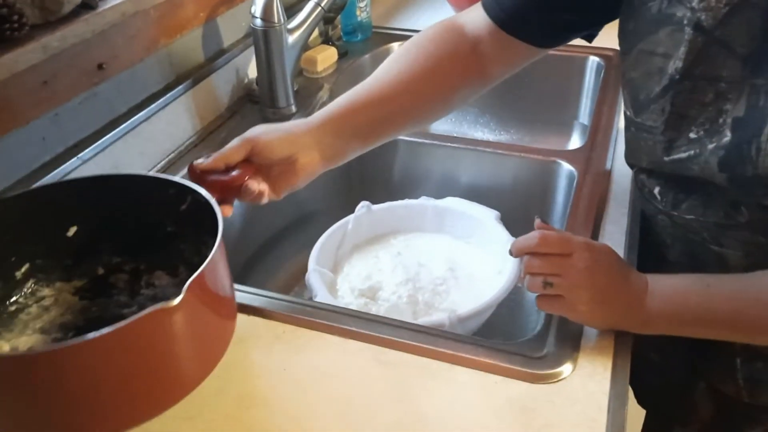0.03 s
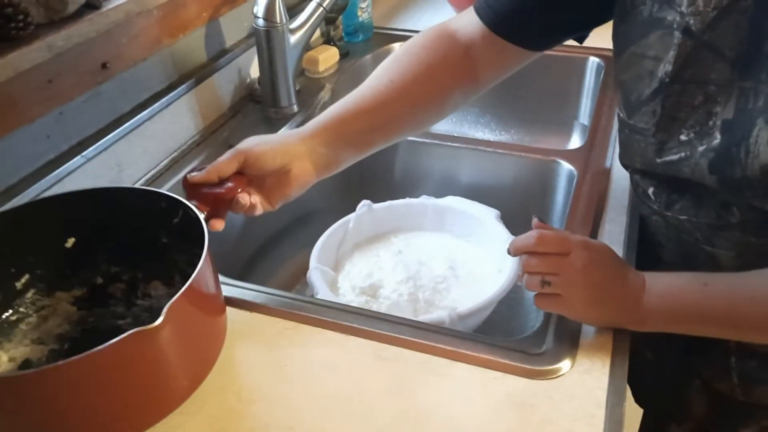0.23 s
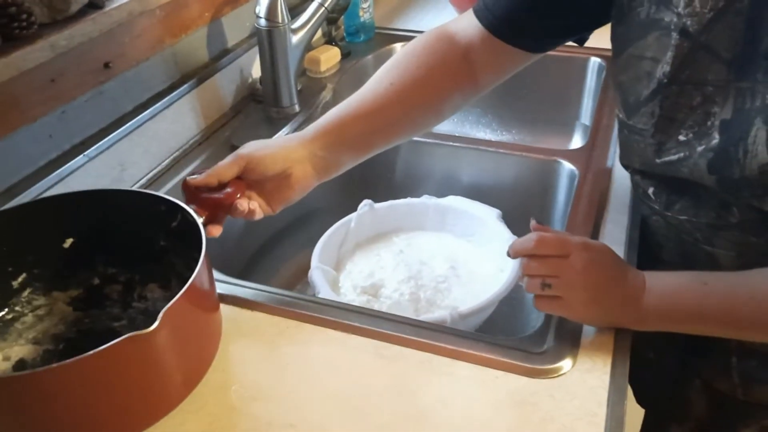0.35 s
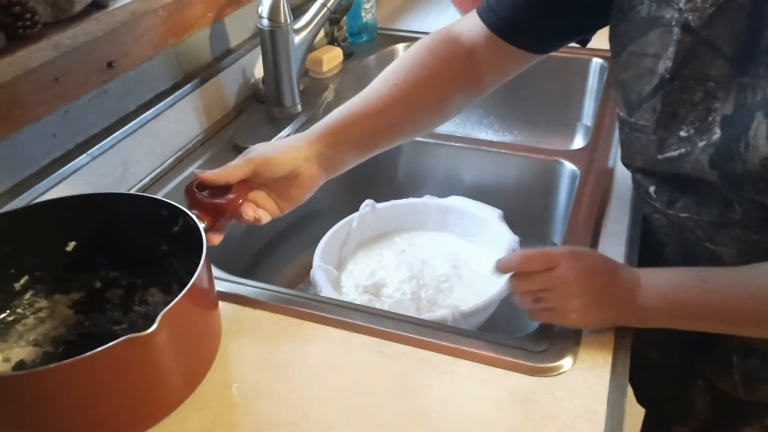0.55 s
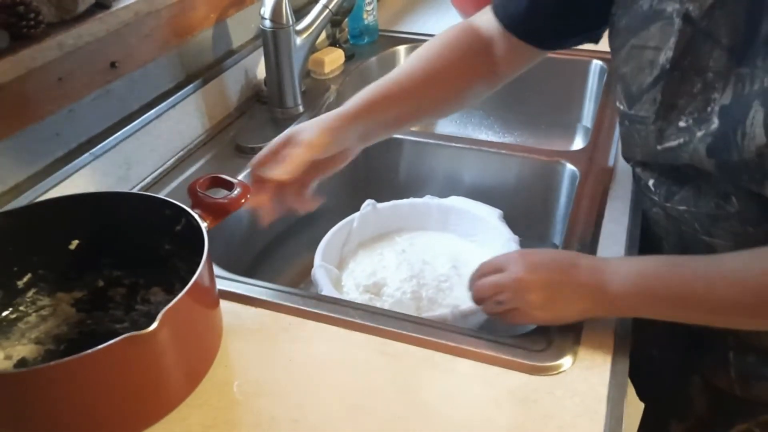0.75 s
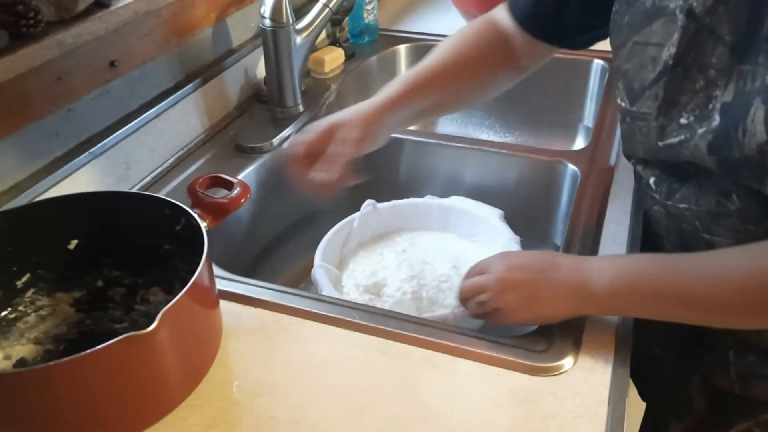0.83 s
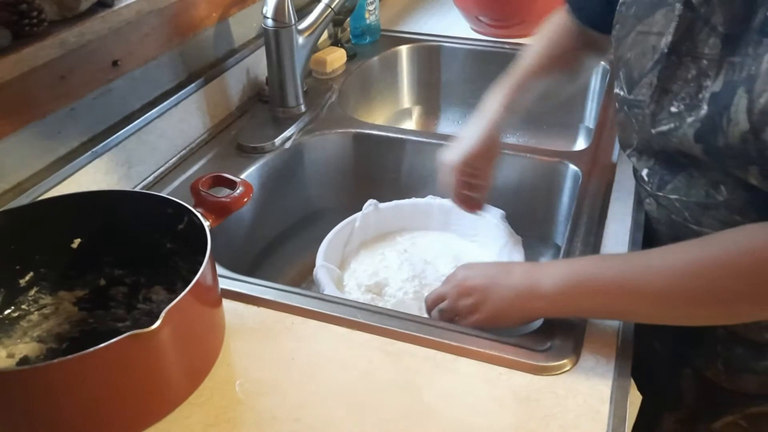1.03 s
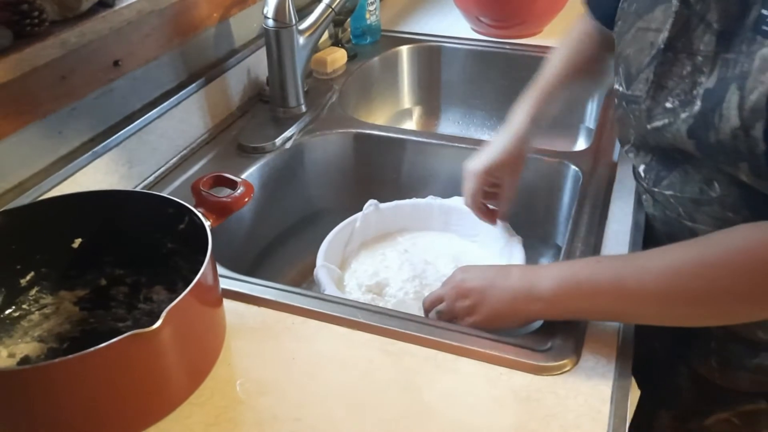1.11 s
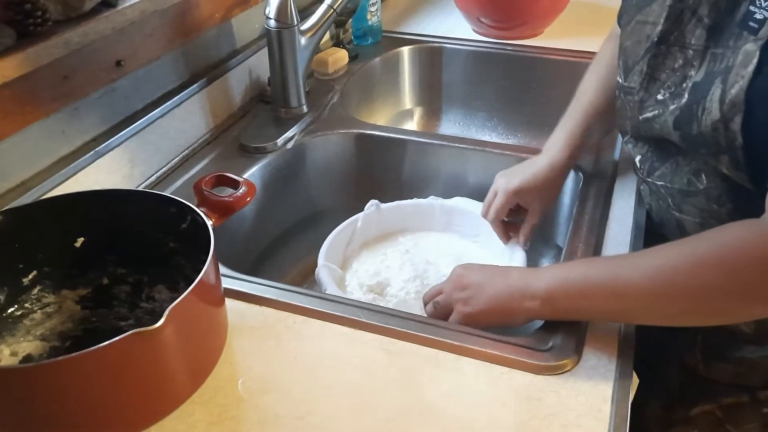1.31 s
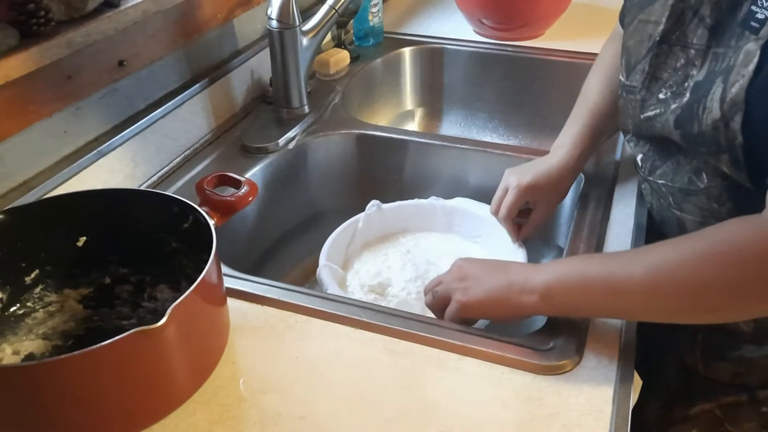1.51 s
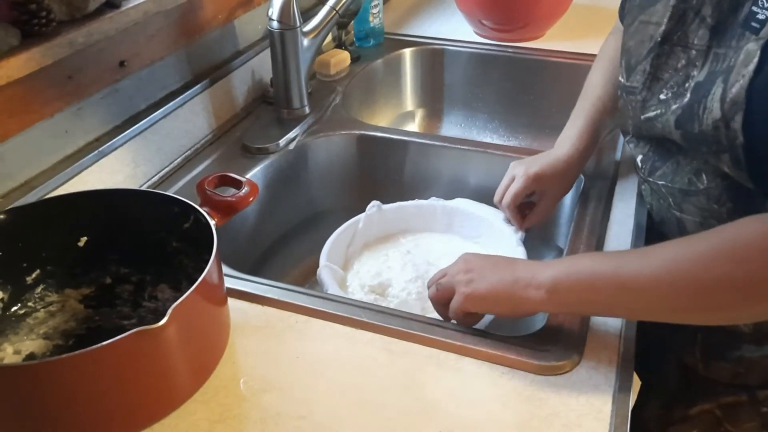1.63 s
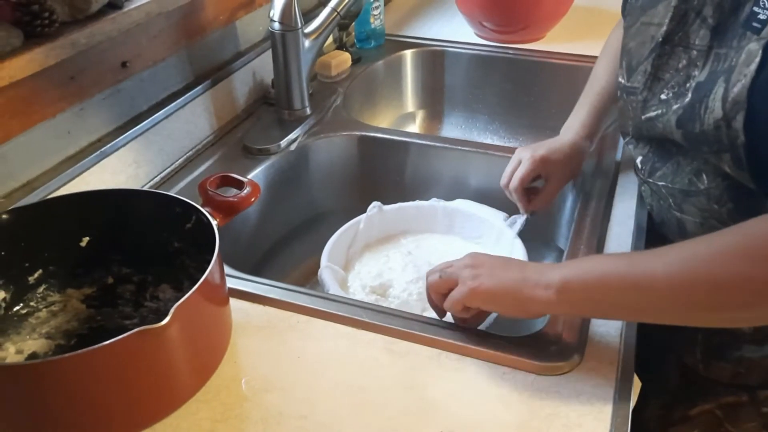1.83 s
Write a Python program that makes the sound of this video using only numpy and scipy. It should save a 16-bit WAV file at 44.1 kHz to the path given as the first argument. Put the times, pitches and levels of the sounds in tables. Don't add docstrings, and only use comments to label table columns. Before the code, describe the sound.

Loud clunk of a pot set on a countertop, brief metallic ring, then drips in a steel sink

```python
import sys
import numpy as np
from scipy import signal
from scipy.fft import rfft, irfft, next_fast_len
from scipy.io import wavfile
from scipy.ndimage import uniform_filter1d, map_coordinates

SR = 44100
rng = np.random.default_rng(int(sys.argv[2]) if len(sys.argv) > 2 else 0)


def dump(signal):
    limited = np.clip(np.atleast_2d(signal).T, -1, 1)
    pcm = np.round(limited * 32767).astype(np.int16)
    wavfile.write(sys.argv[1], SR, pcm)


def voltage_ratio(level):
    return 10 ** (np.asarray(level, float) / 20)


N = 83790


def unit(x):
    return x / np.sqrt(np.mean(x ** 2) + 1e-20)


def along(points, hz):
    f, value = np.transpose(points)
    return np.interp(np.log(hz + 1), np.log(f + 1), value)


def wobble(rate):
    return map_coordinates(rng.standard_normal(200), [np.arange(N) * rate / SR])


def filtered(x, response):
    m = next_fast_len(N + SR // 2)
    return irfft(rfft(x, m) * response(np.fft.rfftfreq(m, 1 / SR)), m)[..., :N]


def dying(s, t60, attack=0.00089):
    t = np.maximum(np.arange(N) / SR - s, 0)
    return voltage_ratio(-60 * t / t60) * (1 - np.exp(-t / attack))


def panned(x, db):
    return x * voltage_ratio(np.array([[db / 2], [-db / 2]]))


# frequency in Hz, left-right correlation from 0 to 1.
ALIKE = [(60, 0.87), (240, 0.77), (950, 0.63), (3770, 0.03), (15000, 0.01)]


def rush(spectrum, patchy_db=0):
    z = signal.stft(rng.standard_normal((2, N)), nperseg=512)[2]
    field = uniform_filter1d(rng.standard_normal(z.shape[1:]), size=5, axis=0)
    field = uniform_filter1d(field, size=12, axis=1)
    pair = signal.istft(z * voltage_ratio(patchy_db * unit(field)), nperseg=512)[1][:, :N]

    def mid_side(hz):
        angle = np.arccos(np.clip(along(ALIKE, hz), -1, 1)) / 2
        return voltage_ratio(along(spectrum, hz)) * [np.cos(angle), np.sin(angle)]

    mid, side = filtered(pair, mid_side)
    return unit(np.array([mid + side, mid - side]))


# frequency in Hz, t60 in s.
KITCHEN = [(100, 0.77), (400, 0.55), (2000, 0.36), (8000, 0.39), (15000, 0.12)]


def room(x):
    hz, t, z = signal.stft(rush([(20, 0)])[:, :SR * 3 // 4], SR, nperseg=256)
    tail = signal.istft(z * voltage_ratio(-60 * t / along(KITCHEN, hz)[:, None]), SR, nperseg=256)[1]
    late = np.pad(x, (130, 0))
    return signal.fftconvolve(late[None], tail / np.linalg.norm(tail[0]), axes=1)[:, :N]


INWARD_HZ = 350
DAMPED_DB_PER_S = 373.5


def ringing(s, free, modes, attack=0.00018):
    t = np.arange(N) / SR - s
    ring = np.zeros(N)
    for hz, db, t60 in modes:
        sign = -1 if hz > INWARD_HZ else 1
        ring += sign * voltage_ratio(db) * dying(s, t60, attack) * np.sin(2 * np.pi * hz * t)
    return ring * voltage_ratio(-DAMPED_DB_PER_S * np.maximum(t - free, 0))


# frequency in Hz, level in dB.
HUM = [(59, -83), (236, -80), (300, -70.5), (355, -69.5), (473.7, -74), (592, -78), (889, -83)]
HUM_WOBBLE_DB = 1


def fridge():
    t = np.arange(N) / SR
    return sum(voltage_ratio(db + 4.5 + HUM_WOBBLE_DB * wobble(7.28)) * np.sin(2 * np.pi * hz * t + 1.1 * wobble(7.2))
               for hz, db in HUM)


# time in seconds, level in dB.
AIR_LEVEL = [(0, -53.5), (.2, -53), (.6, -55.5), (.78, -61), (1.202, -61), (1.55, -61), (1.821, -55.5),
             (1.9, -58)]
# frequency in Hz, density in dB per Hz.
AIR_LOW = [(100, -58.5), (170, -26.5), (299, -5.5), (438, -13), (459, -8), (536, -10), (730, -30),
           (909, -18.5), (1500, -51), (1950, -84.5), (3300, -120)]
AIR_HIGH = [(1000, -17.5), (1600, -4), (2750, -5), (3500, -9), (4200, 1), (5000, -10.5), (6600, 2),
            (7600, -3.5)]
RUMBLE = [(15, -59.5), (25, -43.5), (48, -3.5), (113, -4), (145, -0.5), (190, -2.5), (250, -31),
          (420, -120)]
# frequency in Hz, gain in dB.
AIR_TOP = [(7400, 4.5), (8100, -8), (12000, -8.5), (15900, -15.5)]
AIR_WOBBLE_DB, AIR_PAN_DB = 1.6, -2.5
HISS_DB, HISS_WOBBLE_DB, HISS_PATCHY_DB, HISS_PAN_DB = -72, .5, .9, -5
RUMBLE_DB, RUMBLE_FOLLOWS = -72.5, 0.68


def kitchen_air():
    s, db = np.transpose(AIR_LEVEL)
    swell = np.interp(np.arange(N) / SR, s, db) - db.mean()
    low = voltage_ratio(db.mean() - 3.5 + AIR_WOBBLE_DB * wobble(14)) * rush(AIR_LOW, patchy_db=2.0)
    high = voltage_ratio(HISS_DB + HISS_WOBBLE_DB * wobble(12)) * rush(AIR_HIGH, patchy_db=HISS_PATCHY_DB)
    high = filtered(high, lambda hz: voltage_ratio(along(AIR_TOP, hz)))
    air = voltage_ratio(swell) * panned(low + fridge(), AIR_PAN_DB)
    air += voltage_ratio(0.5 * swell) * panned(high, HISS_PAN_DB)
    return air + voltage_ratio(RUMBLE_DB + RUMBLE_FOLLOWS * swell) * rush(RUMBLE)


# start in seconds, level in dB, centre in Hz, half width in octaves, t60 in s.
SPITS = [(.013, -56, 4660, 1.2, .08), (.183, -52, 5980, 0.99, .08), (.183, -66.5, 13000, .6, .1),
         (.779, -75, 13560, .3, .12), (0.856, -75.5, 12070, .4, .06), (0.882, -55.5, 3970, 1.5, .04),
         (.885, -63, 4520, 0.68, 0.33), (.935, -64, 9380, .9, .06), (1.287, -74.5, 12840, 0.33, 0.07),
         (1.295, -68, 2700, 0.44, 0.21), (1.561, -71, 7900, 0.65, 0.068), (1.411, -67, 6100, 0.89, 0.022),
         (1.578, -62, 2120, 1.1, .3), (1.885, -65, 8540, 0.69, 0.082)]
SPIT_EDGE_DB = -20


def spits():
    out = np.zeros((2, N))
    for s, db, hz, wide, t60 in SPITS:
        band = [(hz * 2 ** (k * wide), SPIT_EDGE_DB * k * k) for k in (-2, -1.5, 0.19, 1.4, 2)]
        out += voltage_ratio(db) * dying(s, t60, 0.00062) * rush(band)
    return out


# width in Hz, level in dB.
SINK_HZ = [880, 1060, 1185, 1620, 1810, 2050, 2400, 2800, 3330]
SINK = [(60, 3.5), (50.4, 11), (60, 9.5), (60, 4.5), (39.8, 4.5), (40, 7.5), (79.4, 5), (120, 17),
        (60, 3.5)]


def bowl(hz):
    response = 1
    for k, (centre, (width, db)) in enumerate(zip(SINK_HZ, SINK)):
        loss = 1j * hz * width
        response = response + (-1) ** k * voltage_ratio(db) * loss / (centre * centre - hz * hz + loss)
    return response


# start in seconds, peak in dB, bubble in Hz, left-right in dB.
DRIPS = [(0.013, -54, 2655, -1), (0.059, -57.5, 2790, -7), (0.082, -61, 2720, -16),
         (0.098, -55.5, 2750, -7), (0.114, -50.5, 970, 6), (0.186, -47.5, 2620, -6.5),
         (0.553, -50, 1120, 8), (0.671, -48, 1181, 11.5), (0.788, -71, 2714, 2.5), (0.88, -47.5, 2382, -6),
         (0.979, -40.5, 1091, 5.5), (1.007, -49, 1214, -3), (1.047, -86, 1136, 2), (1.131, -42, 1132, -0.5),
         (1.23, -58.5, 1174, 6), (1.291, -52.5, 1720, -11), (1.413, -36.5, 1550, 8.5),
         (1.478, -56, 2870, -4.5), (1.544, -47.5, 2000, -0.5), (1.574, -44.5, 3220, -11),
         (1.601, -50.5, 1390, 1), (1.629, -55.5, 3236, -0.5), (1.808, -68.5, 2790, -19),
         (1.882, -57, 2820, -4)]
# start in seconds, peak in dB, bubble in Hz.
TWINS = [(0.011, -54.5, 1250), (0.014, -50, 4550), (0.06, -50, 1310), (0.083, -46, 1310),
         (0.88, -52.5, 1187), (0.883, -55, 2870), (0.935, -55, 1200), (.98, -49, 1280), (1.052, -58, 2000),
         (1.052, -70, 2800), (1.131, -41, 1026), (1.296, -61.5, 2770), (1.411, -56, 2760),
         (1.412, -55.5, 1166), (1.576, -55.5, 1230), (0.531, -57, 2900), (1.616, -62, 2240),
         (1.839, -68, 2800), (.857, -72.5, 2340), (0.099, -55, 1253), (1.586, -51, 3350),
         (1.556, -61, 2500), (1.591, -53, 1990), (1.641, -59, 1970)]
TRICKLE_RATE, TRICKLE_DB, TRICKLE_HZ = 90, -78, 2400
BUBBLE_S, LIFE_SLOPE, RISE, BUBBLE_ONSET = .0028, -.3, .02, .8
FLUTTER_T60, FLUTTER_DB = .12, 3
DRIP_DB, DRIP_WET_DB = -6, -7.5


def drips():
    big = list(DRIPS) + [(*row, 0) for row in TWINS]
    small = [(a * 170 / TRICKLE_RATE, TRICKLE_DB + 8 * b, TRICKLE_HZ * 2 ** (c - .5), 6 * d - 3)
             for a, b, c, d in rng.random(size=(170, 4))]
    push = np.zeros((2, 3 * N))
    t, u = np.arange(1500) / SR, np.arange(9000) / SR
    for k, (s, db, hz, pan_db) in enumerate(big + small):
        life = BUBBLE_S * (hz / 1000) ** LIFE_SLOPE
        bubble = np.sin(2 * np.pi * hz * t * (1 + RISE * t / life))
        bubble *= np.exp(-t / life) * (1 - np.exp(-t * hz / BUBBLE_ONSET))
        if k < len(big):
            walls = rng.standard_normal((2, len(u))) * voltage_ratio(-60 * u / FLUTTER_T60)
            walls *= voltage_ratio(FLUTTER_DB) / np.linalg.norm(walls[0])
            walls[:, 0] = 1
            bubble = signal.fftconvolve(bubble[None], walls, axes=1)
        i = round(s * SR)
        push[:, i:i + bubble.shape[-1]] += panned(voltage_ratio(db + DRIP_DB) * bubble, np.clip(pan_db, -6, 6))
    dry_drips = filtered(push[:, :N], bowl)
    spray = spits()
    return dry_drips + spray + voltage_ratio(DRIP_WET_DB) * room(dry_drips.mean(0) + spray[0])


# start in seconds, thud in dB, boom in dB, crack or knock in dB, free ringing in s.
CONTACTS = [
    (0.2149, -48, -59, -63, 0.0084),
    (0.2219, -11.5, -15, -16, 0.15),
    (0.2783, -17.5, -47, -27, 0.34),
    (0.414, -33, -65, -24, 0.023),
    (0.4172, -28.5, -31.5, -29.5, 0.015),
    (0.459, -41, -69, -41, 0.078),
]
THUD_ATTACK_S = .0012
# level in dB, t60 in s.
COUNTER_HZ = [68, 200, 303, 360, 414, 538, 558, 612, 706]
COUNTER = [(-20, 0.38), (-12.5, 0.097), (-3.5, 0.08), (14, .017), (-3, 0.22), (-17.5, 0.43), (-17, .3),
           (-17.5, .12), (-22.5, 0.37)]


def counter_thud():
    modes = [(hz, *mode) for hz, mode in zip(COUNTER_HZ, COUNTER)]
    return sum(voltage_ratio(db) * ringing(s, free, modes, THUD_ATTACK_S) for s, db, _, _, free in CONTACTS)


# frequency in Hz, level in dB, t60 in s.
BOOM = [(143, -0.5, .7)]
SETTLE_MODES = [(65, -13.5, 0.6), (142.6, 1, 0.29), (239, -12, 0.087), (320, 5.5, 0.043)]
SETTLE_S, SETTLE_DB, SETTLE_FREE_S = .586, -39, .07


def cupboard_boom():
    boom = sum(voltage_ratio(db) * ringing(s, free, BOOM, THUD_ATTACK_S) for s, _, db, _, free in CONTACTS)
    return boom + voltage_ratio(SETTLE_DB) * ringing(SETTLE_S, SETTLE_FREE_S, SETTLE_MODES, 0.0024)


# frequency in Hz, density in dB per Hz.
KNOCK = [(90, -24.5), (280, 6), (500, -8.5), (850, -0.5), (1300, -10.5), (2500, -29), (6000, -41),
         (15900, -51.5)]
KNOCK_T60, KNOCK_ATTACK_S = 0.05, 0.0036


def rocking_knock():
    return sum(voltage_ratio(db) * dying(s, KNOCK_T60, KNOCK_ATTACK_S) for s, _, _, db, _ in CONTACTS[2:]) * rush(KNOCK)


# frequency in Hz, density in dB per Hz.
CRACK = [(300, -63.5), (600, -22), (1000, -10), (2500, -18), (6000, -14.5), (8500, -27), (12000, -28),
         (15900, -41.5)]
TICK = [(700, -31), (1500, 1), (2900, 0.5), (5000, -12), (8000, -23.5), (15900, -34.5)]
CRACK_T60, RATTLE_T60, RATTLE_DB = 0.024, 0.065, -4
TICK_S, TICK_DB, TICK_T60 = .4126, -33, .03


def crack_and_tick():
    crack = sum(voltage_ratio(db) * (dying(s, CRACK_T60) + voltage_ratio(RATTLE_DB) * dying(s, RATTLE_T60))
                for s, _, _, db, _ in CONTACTS[:2])
    return crack * rush(CRACK) + voltage_ratio(TICK_DB) * dying(TICK_S, TICK_T60, 0.00039) * rush(TICK)


CLANG_S, SWELL_S = .222, 0.009
SHIMMER_DB, SHIMMER_TILT_DB, SHIMMER_T60 = -47, -5, .24
BODY_DB, BODY_T60 = -43, 0.33


def shimmer():
    def high():
        return [(3000 + 12000 * a, SHIMMER_TILT_DB * a * 2 + 5 * b, SHIMMER_T60 * (0.73 + c * .5))
                for a, b, c in rng.random(size=(70, 3))]

    def body():
        return [(700 + 2600 * a, 6 * b, BODY_T60 * (.5 + c)) for a, b, c in rng.random(size=(24, 3))]

    top = np.array([ringing(CLANG_S, 0.38, high(), SWELL_S) for _ in "LR"])
    return voltage_ratio(SHIMMER_DB) * top + voltage_ratio(BODY_DB) * np.array([ringing(CLANG_S, .2, body(), SWELL_S) for _ in "LR"])


# level in dB, t60 in s, left-right in dB.
POT_HZ = [938, 1028, 1186, 1441, 1741, 2056, 2347, 2701, 3098, 3584, 3871, 4635, 4893]
POT = [(-10.5, 0.28, -9), (-11.5, 0.34, -5), (-4.5, 0.65, 0.5), (-13.5, .26, 3.5), (0.5, 0.4, -5),
       (-14.5, 0.36, -7.5), (-7, 0.44, 2.5), (-17, .35, 10.5), (-7.5, 0.13, 12), (-14.5, .33, -3.5),
       (-22, .35, -5), (-19.5, 0.32, -5), (-19, .2, -7)]
CLANG_FREE_S, CLANG_DB = .115, -19.5
SPLIT_HZ, SPLIT_DB, SPLIT_T60, SPLIT_PAN_DB = 1176, -6, .45, 0.84


def clang():
    ring = sum(panned(ringing(CLANG_S, CLANG_FREE_S, [(hz, db, t60)], SWELL_S), pan_db)
               for hz, (db, t60, pan_db) in zip(POT_HZ, POT))
    ring -= panned(ringing(CLANG_S, CLANG_FREE_S, [(SPLIT_HZ, SPLIT_DB, SPLIT_T60)], SWELL_S), SPLIT_PAN_DB)
    return voltage_ratio(CLANG_DB) * np.array([ring[0], np.roll(ring[1], shift=5)])


# frequency in Hz, left-right in dB.
HIGH_PAN = [(600, 2), (1500, 1.5), (3000, 1), (5500, -6), (8000, -1), (12000, 4.5)]
COUNTER_PAN_DB = 3
POT_WET_DB, CLANG_WET_DB, THUD_WET_DB = -3, -12, -5.5


def pot():
    wood = counter_thud() + rocking_knock()
    rasp = shimmer() + crack_and_tick()
    metal = clang()
    send = voltage_ratio(POT_WET_DB) * (rasp[0] + voltage_ratio(CLANG_WET_DB) * metal[0]) + voltage_ratio(THUD_WET_DB) * wood[0]
    bright = filtered(rasp + room(send), lambda hz: panned(0.82, along(HIGH_PAN, hz))[:, 0])
    return metal + panned(wood + cupboard_boom(), COUNTER_PAN_DB) + bright


def scene():
    return kitchen_air() + drips() + pot()


def band_limit(x):
    return signal.sosfilt(signal.butter(12, 15990, fs=SR, output="sos"), x)


def record(dry):
    mix = filtered(dry, lambda hz: (hz < 15800) * (1j * hz / (1j * hz + 30)) ** 2)
    return band_limit(mix)


dry = scene()
out = record(dry)
dump(out)
```